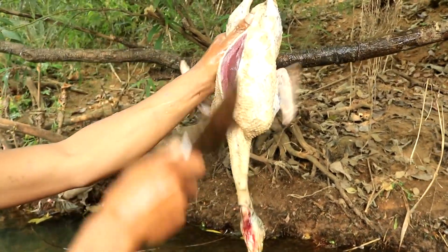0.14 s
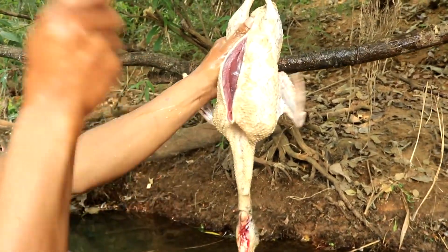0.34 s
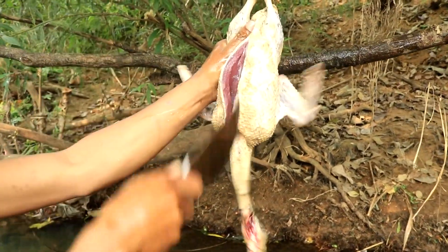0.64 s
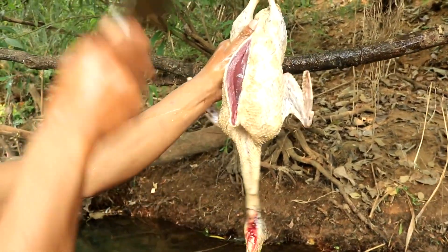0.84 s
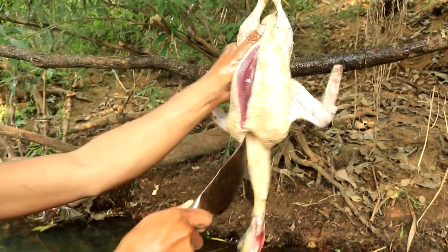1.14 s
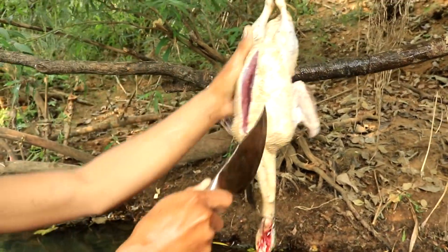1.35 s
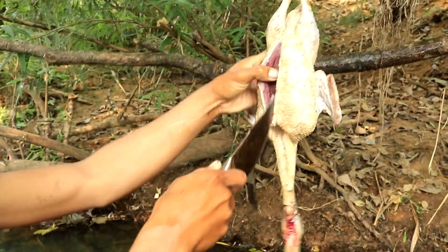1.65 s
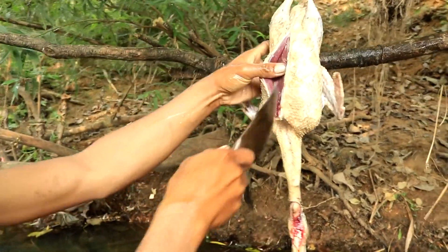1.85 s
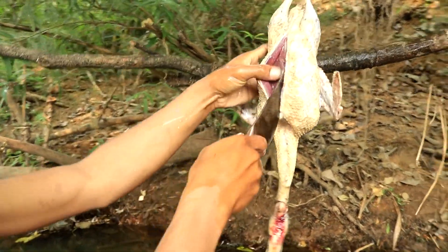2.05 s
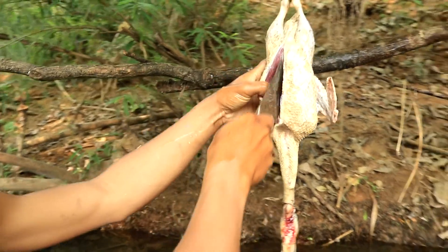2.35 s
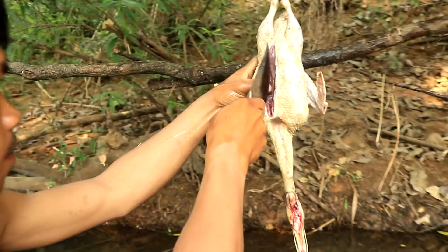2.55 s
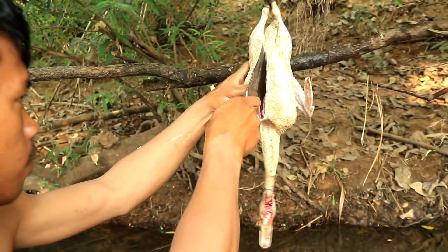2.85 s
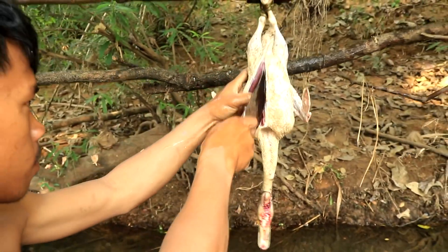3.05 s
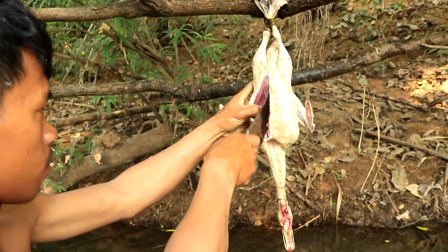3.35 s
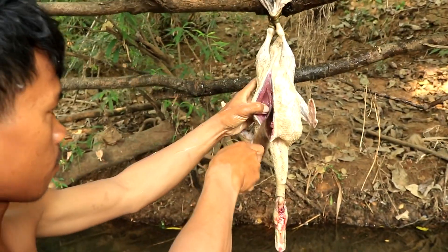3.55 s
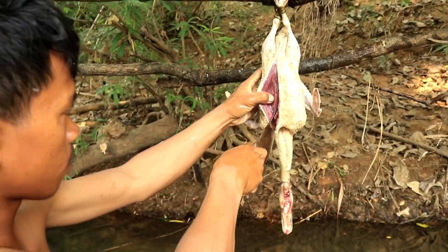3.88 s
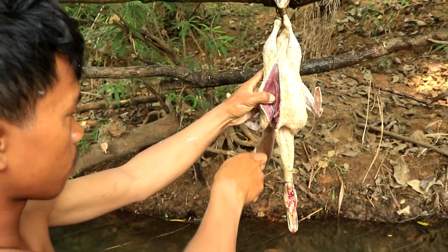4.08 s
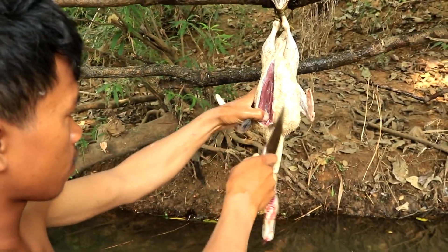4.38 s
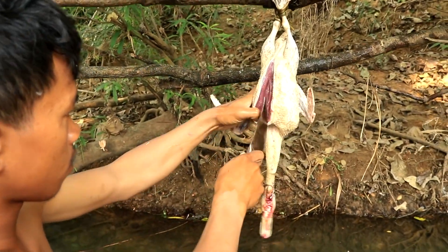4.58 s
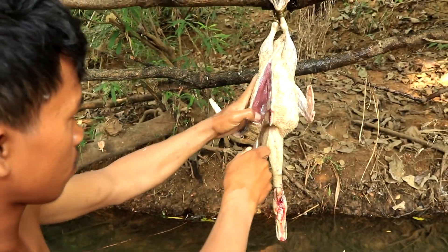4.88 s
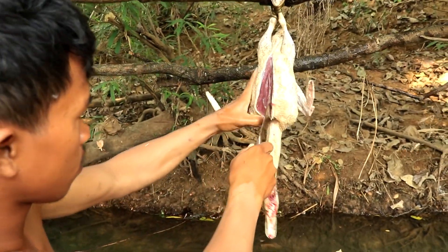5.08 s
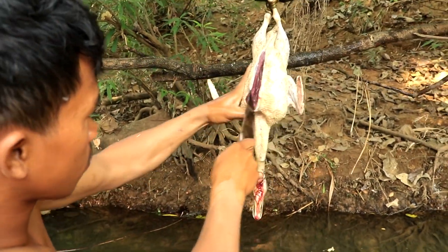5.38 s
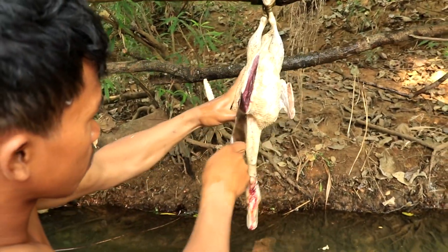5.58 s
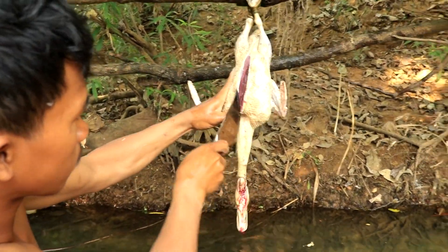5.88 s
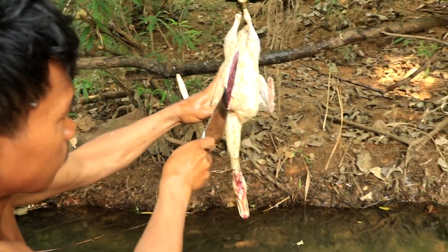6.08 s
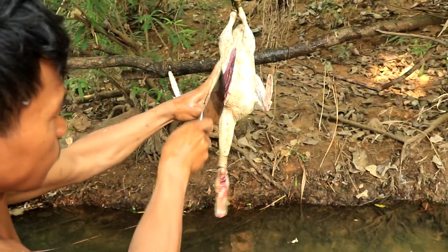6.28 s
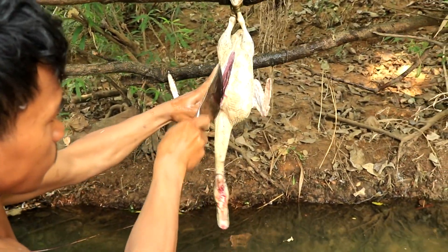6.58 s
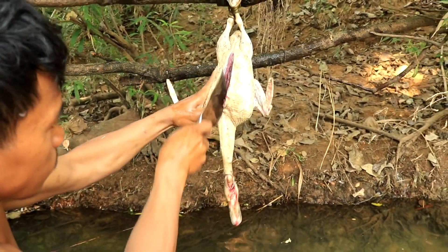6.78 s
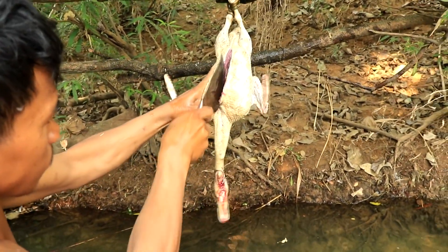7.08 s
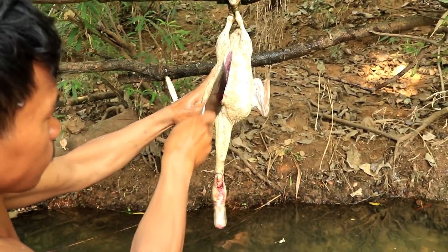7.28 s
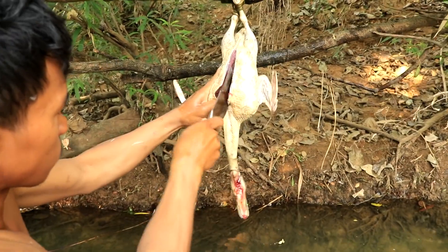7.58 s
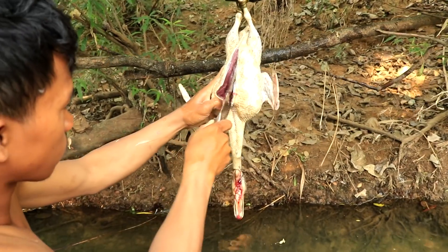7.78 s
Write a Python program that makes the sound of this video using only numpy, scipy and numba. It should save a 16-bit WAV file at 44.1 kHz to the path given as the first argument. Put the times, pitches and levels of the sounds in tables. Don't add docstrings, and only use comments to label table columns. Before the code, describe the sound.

By a murmuring jungle stream with shrill insects, a knife chops bone three times, taps lightly, and finally saws flesh in fast metallic rasps.

```python
import sys
import numpy as np
from scipy import signal
from scipy.fft import rfft, irfft
from scipy.io import wavfile
from scipy.ndimage import uniform_filter1d
from numba import njit

SR = 44100
rng = np.random.default_rng(int(sys.argv[2]) if len(sys.argv) > 2 else 0)


def magnitude_from_level(level_db):
    exponent = np.asarray(level_db, float) / 20
    return 10 ** exponent


def unload_wav(signal):
    wavfile.write(
        sys.argv[1],
        SR,
        np.round(np.clip(np.atleast_2d(signal).T, -1, 1) * 32767).astype(np.int16),
    )


N = 349697
TIME = np.arange(N) / SR
HZ = np.maximum(np.arange(N // 2 + 1) * SR / N, 1)
RISE_S = .0001


def unit(x):
    return x / np.sqrt(np.mean(x ** 2))


def on_log(table):
    hz, value = np.transpose(table)
    return np.interp(np.log(HZ), np.log(hz), value)


def noise(like):
    mid, side = rfft(rng.standard_normal((2, N)))
    like = np.clip(like, 0, 1)
    return np.sqrt(1 + like) * mid + np.sqrt(1 - like) * side * np.array([[1], [-1]])


def hiss(table, like):
    return unit(irfft(noise(like) * magnitude_from_level(on_log(table)), N))


def walk(rate):
    hold = int(SR / rate)
    steps = np.repeat(rng.standard_normal(N // hold + 1), hold)
    return unit(uniform_filter1d(uniform_filter1d(steps, hold), hold)[:N])


def ring(x, hz, t60):
    pole = np.exp(2j * np.pi * hz / SR - np.log(1000) / (t60 * SR))
    return signal.lfilter([0, pole.imag], [1, -2 * pole.real, abs(pole) ** 2], x)


def body(x, modes):
    out = 0
    for k, (hz, width, db) in enumerate(modes):
        out = out + magnitude_from_level(db) * (-1) ** k * signal.lfilter(*signal.iirpeak(hz, hz / width, SR), x)
    return out


def burst(s, t60, rise):
    part = slice(max(int((s - 6 * rise) * SR), 0), int((s + 2 * t60) * SR))
    t = TIME[part] - s
    return part, np.where(t < 0, np.exp(np.minimum(t, 0) / rise), magnitude_from_level(-60 * t / t60))


def pan(db):
    return magnitude_from_level(np.array([db, -db]) / 2).reshape(2, -1)


def left_late(x, samples):
    return irfft(rfft(x) * np.exp(-2j * np.pi * HZ / SR * np.array([[samples], [0]])), N)


def stream(db, splash_db):
    # (frequency [Hz], level [dB])
    water_colour = [(13, -37), (22, -10), (54, -3), (153, -6.5), (194, -11), (312, -8), (512, -11.5),
                    (619, -14), (823, -14.5), (1490, -12.5), (3490, -18), (4310, -20), (5340, -24),
                    (6300, -24.5), (8190, -68.5), (13900, -120)]
    # (frequency [Hz], correlation [0-1])
    likeness = [(60, 0.86), (300, 0.56), (700, 0.53), (1500, 0.15), (3000, 0.23)]
    swell, gust = walk(0.83), walk(18)
    white = noise(on_log(likeness)) * magnitude_from_level(on_log(water_colour))
    out = 0
    for hz in 25 * 2 ** np.arange(0, 8.6, .5):
        share = np.clip(1 - np.abs(2 * np.log2(HZ / hz)), 0, 1)
        gust_db = np.interp(np.log(hz), np.log([50, 200]), [3.5, 0])
        splashing = np.interp(np.log(hz), np.log([1500, 3500]), [0, 1])
        tilt_db = (splash_db - splash_db.mean()) * splashing
        level_db = 0.7 * swell + walk(6) + gust_db * gust + tilt_db
        out = out + irfft(white * share, N) * magnitude_from_level(level_db)
    return left_late(unit(out) * magnitude_from_level(db + 8.5) * pan(0.096), 5.94)


def insects(db):
    # (frequency [Hz], level [dB])
    trill = [(3710, -47), (6300, -48.5), (6580, -6), (7310, 3), (7680, 2), (8000, -13.5), (8280, -4),
             (8340, -36), (8500, -29.5), (11000, -46), (18700, -120)]
    out = 0
    for hz in np.arange(6560, 8400, 150):
        share = np.exp(-((HZ - hz) / 110) ** 4) * magnitude_from_level(on_log(trill))
        rate_hz = 45 * rng.integers(1, 4) * (1 + 0.031 * walk(2))
        phase = 2 * np.pi * np.cumsum(rate_hz) / SR + 2 * np.pi * rng.random()
        throb = 1 + .5 * np.sin(phase)
        out = out + irfft(noise(0) * share, N) * throb * magnitude_from_level(1.9 * walk(5.4))
    return unit(out) * magnitude_from_level(db + 3.5)


def leaves(db):
    # (frequency [Hz], level [dB])
    leaf_colour = [(5000, -8.5), (8500, -2.5), (8620, -3), (9550, -2.5), (13100, -7.5), (15100, -7),
                   (16200, -23.5)]
    flutter_db = 1.13 * walk(300) + 0.84 * walk(25)
    return hiss([(4000, -5.5)] + leaf_colour, 0) * magnitude_from_level(db + 6.5 + flutter_db)


def chops():
    # (time [s], crack [dB], crack t60 [s], thud [dB], blade ring [dB])
    contacts = [
        (.0162, -36.5, 0.036, -46.5, -76),
        (.0173, -9.5, 0.033, -6.5, -63),
        (.5523, 4, 0.016, -38, -7.5),
        (.5542, -9, 0.01, -18.5, -31),
        (1.1175, -23, 0.012, -50, -49),
        (1.1187, -10, 0.041, -11.5, -23.5),
    ]
    # (frequency [Hz], level [dB])
    crack_colours = [
        [(240, -41.5), (400, 2.5), (730, -6.5), (3210, -1.5), (3690, -9.5), (9180, -8.5), (10100, -3.5),
         (14600, -18), (16000, -32)],
        [(240, -21), (400, -32), (1650, -8), (3120, -5.5), (7870, -6.5), (9760, -8), (10500, -5), (13300, -6),
         (16000, -42)],
        [(240, -21), (400, 0), (1580, -11.5), (2550, -7), (5960, -1), (10500, -1), (12700, 1.5), (15300, -8),
         (16000, -33)],
    ]
    # (time [s], frequency [Hz], level [dB], t60 [s])
    snaps = [
        (.0177, 1250, 1.5, .004),
        (1.1184, 6000, 3.5, .004),
    ]
    # (frequency [Hz], level [dB], t60 [s])
    blade_modes = [(2690, -19, 0.095), (3120, -2.5, 0.0395), (3230, -36, 0.38), (5730, -3, 0.0182),
                   (9050, -29, .04), (9700, 3, 0.027), (11460, -4, 0.025)]
    contact_pan_db = (0, -5)
    out, kick, push = np.zeros((3, 2, N))
    cracks = [hiss(colour, 0.88) for colour in crack_colours]
    scatter = hiss([(1000, -22), (4000, -13), (9500, -10), (16000, -21)], .4)
    for k, (s, crack_db, t60, thud_db, ring_db) in enumerate(contacts):
        side = pan(contact_pan_db[k % 2])
        part, env = burst(s, t60, RISE_S)
        out[:, part] += magnitude_from_level(crack_db) * env * cracks[k // 2][:, part] * side
        part, env = burst(s, .12, RISE_S)
        out[:, part] += magnitude_from_level(crack_db - 27) * env * scatter[:, part]
        kick[:, int(s * SR)] = magnitude_from_level(ring_db) * side[:, 0]
        part, env = burst(s + 0.00034, 0.0007, 0.0001)
        push[:, part] -= magnitude_from_level(thud_db) * env / env.sum()
    for s, hz, db, t60 in snaps:
        hit = np.arange(N) == int(s * SR)
        out += ring(-magnitude_from_level(db) * hit, hz, t60) * pan(-2.6)
    thud = ring(push, 284, 0.032) + magnitude_from_level(-14.5) * ring(push, 454.4, 0.057)
    blade = sum(magnitude_from_level(db) * ring(kick, hz, t60) for hz, db, t60 in blade_modes)
    return out + thud + blade


def drips():
    # (time [s], level [dB], pitch [Hz], t60 [s], rise of pitch [1/s])
    bubbles = [(0.277, -40.5, 2900, 0.0174, 2), (.695, -37.5, 1500, 0.0073, 1),
               (1.579, -32.5, 653, 0.03, 2.2), (1.71, -42, 1770, 0.0475, 3), (2.789, -41, 2550, 0.022, 2),
               (3.075, -39.5, 2220, 0.021, 2), (3.125, -33.5, 870, 0.11, 1.4), (3.16, -49, 1010, 0.55, 8),
               (3.255, -40, 2070, .02, 3), (3.355, -41, 2660, 0.023, 2), (7.71, -48, 1240, 0.045, 1.6)]
    out = np.zeros(N)
    for s, db, hz, t60, glide in bubbles:
        part, env = burst(s, t60, 0.000122)
        t = TIME[part] - s
        tone = np.sin(2 * np.pi * hz * (t + glide * t * t / 2))
        out[part] += magnitude_from_level(db + 1.7 * walk(60)[part]) * env * tone
    return out * pan(-1.8)


def ticks():
    # (time [s], treble [dB], knock [dB], knock pitch [Hz], bass [dB])
    taps = [
        (1.3662, -32, -40, 2400, -63),
        (1.6328, -36, -39, 3640, -57),
        (2.3138, -41, -36, 2930, -64),
        (3.125, -44, -31, 3970, -47),
        (5.744, -31, -36.5, 5690, -58),
        (5.9478, -26, -27.5, 3200, -36.5),
        (6.1968, -29, -27, 3860, -58),
    ]
    # (time [s], treble [dB], knock [dB], bass [dB])
    catches = [(5.9713, -39, -41, -60), (6.2397, -39, -41, -45), (6.4481, -26, -23, -37.5),
               (6.419, -49, -34.5, -55), (6.5573, -33, -25, -45), (6.596, -36, -33, -40),
               (6.681, -21.5, -24, -45), (6.7119, -27, -24, -34.5), (6.946, -30, -29.5, -35.5),
               (7.0409, -35, -28.5, -43), (7.1632, -26.5, -36, -53), (7.18, -32, -32, -52),
               (7.189, -36, -26, -50), (7.213, -23.5, -47.5, -34.5), (7.447, -31, -28, -46),
               (7.4547, -30, -36.5, -37), (7.479, -27, -28, -43)]
    # (time [s], level [dB], knock pitch [Hz], left minus right [dB])
    crackles = [(0.395, -34.5, 5620, 4), (0.4612, -37.5, 4710, 8), (1.504, -39, 2690, 11.5),
                (3.6, -39.5, 2690, -11), (4.6444, -38, 2190, -8.5), (4.8313, -40, 2450, 1.5),
                (4.8383, -37.5, 4240, 1.5), (4.9656, -45, 4640, -4), (6.125, -41, 2200, -6.5),
                (7.4024, -40, 2420, 0), (7.424, -35, 2760, 7), (7.522, -38, 2140, 0),
                (7.642, -39, 2040, 9.5), (7.7641, -36.5, 3470, 15), (7.884, -33.5, 2000, 10)]
    knife_pan_db, catch_hz = -4, 2700
    spit = hiss([(3000, -40), (6000, 0.5), (10000, 5.5), (16000, -6.5)], 0.56)
    knock = hiss([(700, -7.5), (2500, -1.5), (4500, -3), (8000, -28)], 0.69)
    rows = [(*tap, knife_pan_db) for tap in taps]
    rows += [(s, treble, mid, catch_hz, bass, knife_pan_db) for s, treble, mid, bass in catches]
    rows += [(s, db, db - 10, hz, db - 21, side_db) for s, db, hz, side_db in crackles]
    out, push = np.zeros((2, 2, N))
    for s, treble_db, knock_db, hz, bass_db, pan_db in rows:
        part, env = burst(s, 0.019, RISE_S)
        pitched = unit(knock[:, part] + 1.8 * body(knock[:, part], [(hz, 600, 0)]))
        snap = magnitude_from_level(treble_db - 3) * spit[:, part] + magnitude_from_level(knock_db - 4) * pitched
        out[:, part] += env * pan(pan_db) * snap
        push[:, int(s * SR)] = magnitude_from_level(bass_db + 4)
    return out + ring(push, 325, 0.026)


def singing():
    # (time [s], level [dB], t60 [s], stilled by the grip at [s], muffled at first [0-1])
    long_notes = [
        (.5525, -37, 1.207, 1.024, .8),
        (1.119, -32.5, 0.55, 1.23, .05),
    ]
    # (time [s], level [dB], length [s], frequency [Hz], width [Hz])
    touches = [
        (.588, -32, 0.051, 9000, 200),
        (2.326, -58.5, 0.69, 4290, 150),
        (3.055, -45.5, 0.037, 5800, 1000),
        (7.52, -56, .9, 140, 60),
        (3.4, -57.5, 0.41, 11000, 900),
        (3.783, -53, 0.366, 11070, 900),
        (4.788, -57, 0.76, 4290, 200),
    ]
    note_hz, sag_hz, settle_s = 4290, 90, .022
    beat_hz, beat_depth = 6.1, 0.33
    out = np.zeros(N)
    for s, db, t60, stilled, muffled in long_notes:
        part, env = burst(s, t60, RISE_S)
        t = np.maximum(TIME[part] - s, 0)
        loaded = np.exp(-t / settle_s)
        grip = (1 - muffled * loaded) / (1 + np.exp((TIME[part] - stilled) / 0.038))
        hz = note_hz - sag_hz * loaded + 4 * walk(12)[part]
        swing = 1 - beat_depth * np.cos(2 * np.pi * beat_hz * (t - .03))
        tone = np.sin(2 * np.pi * np.cumsum(hz) / SR)
        out[part] += magnitude_from_level(db + 0.52 * walk(27.4)[part]) * env * grip * swing * tone
    for s, db, length, hz, width in touches:
        part, env = burst(s, 2 * length, 0.0063)
        rub = rng.standard_normal(len(env))
        out[part] += magnitude_from_level(db) * env * unit(body(rub, [(hz, width, 0)]))
    return out * pan(-2.17)


def fly():
    # (time [s], wing beat [Hz], level [dB])
    flight = [
        (3.85, 329.4, -65),
        (3.95, 339.5, -49),
        (4.01, 387, -52),
        (4.1, 338, -53),
        (4.16, 320, -59),
        (4.27, 373, -60),
        (4.4, 400, -57.5),
        (4.5, 400, -73),
    ]
    s, hz, db = np.transpose(flight)
    wing_hz = np.interp(TIME, s, hz) * (1 + .06 * walk(50))
    phase = 2 * np.pi * np.cumsum(wing_hz) / SR
    level_db = np.interp(TIME, s, db, -150, -150) + 3.3 * walk(21.97)
    return magnitude_from_level(level_db) * (np.sin(phase) + 0.19 * np.sin(2 * phase))


def pressure():
    # (time of greatest pressure [s], blade level there [dB], build-up [s], let-off [s],
    # rasp [dB]: skin scrapes more than it rings)
    strokes = [(6.342, -45, 0.079, 0.021, 4.5), (6.452, -45.5, 0.041, 0.039, -1.5),
               (6.572, -35.5, 0.034, .03, -2.5), (6.606, -36, 0.022, 0.023, -2),
               (6.683, -37, 0.0289, 0.04, -1.5), (6.714, -42, .015, 0.04, 2), (6.83, -39, 0.0466, 0.043, 0),
               (6.95, -39.5, 0.0081, 0.036, 1.5), (7.058, -36.5, .028, .02, -2),
               (7.088, -32, .05, 0.048, 0.5), (7.195, -31, 0.023, 0.05, -1),
               (7.33, -34.5, 0.0368, 0.062, -1), (7.451, -42, .01, 0.0313, 2.5),
               (7.481, -45, 0.0147, 0.018, 3.5)]
    edge_db, curve = 24.5, 1.68
    out, rasp = np.full(N, -200.), np.zeros(N)
    for s, db, build, release, rasp_db in strokes:
        t = TIME - s
        stroke = db - edge_db * np.abs(t / np.where(t < 0, build, release)) ** curve
        rasp[stroke > out] = rasp_db
        out = np.maximum(out, stroke)
    return out, uniform_filter1d(rasp, size=300)


def sawing():
    # (frequency [Hz], width [Hz], level [dB])
    held_blade = [(1190, 480, -15), (2000, 860, -15.5), (2712, 195, 7), (3285, 770, -6)]
    # (frequency [Hz], width [Hz], level [dB])
    high_notes = [(6080, 910, -8.5), (8880, 220, -2), (9695, 140, 1.5), (11300, 220, -7), (12250, 320, -8)]
    # (frequency [Hz], width [Hz], level [dB])
    carcass_modes = [(212, 77, -3), (303, 54, 0.5), (484, 155, -8.5)]
    blade_db, rasp_db = pressure()
    touching = np.clip((blade_db + 77) / 15, 0, 1)
    firm_db = -40

    def saturating(db, share):
        return touching * magnitude_from_level(firm_db + rasp_db + db + share * (blade_db - firm_db))

    carcass = saturating(-5.5, 0.6)
    bright = saturating(-3.5, 0.66)
    upper = saturating(-12.5, 0.62) * magnitude_from_level(-18 * (TIME - 6.98))

    grit = hiss([(100, 0), (16000, 0)], 0.91) * magnitude_from_level(1.86 * walk(250) + 1.14 * walk(90))
    slips = rng.random(N) < 350 / SR
    grit = grit + slips * rng.standard_normal(N) * magnitude_from_level(15)

    shake = 0
    for hz, width, db in held_blade:
        mode = body(body(grit, [(hz, width, 0)]), [(hz, 2 * width, 0)])
        shake = shake + magnitude_from_level(db + 2 * walk(40)) * mode
    notes = sum(body(grit, [mode]) * magnitude_from_level(4.9 * walk(25)) for mode in high_notes)
    air_colour = [(1000, -8.5), (2500, 2.5), (7000, -8.5), (10000, -0.5), (13000, -11), (16000, -20)]
    air = irfft(rfft(grit) * magnitude_from_level(on_log(air_colour)), N)
    upper_note = unit(body(grit, [(4290, 65, 0)]))

    steel = magnitude_from_level(blade_db) * unit(shake)
    steel = steel + upper * magnitude_from_level(-4 + 3.5 * walk(30)) * upper_note
    steel = steel + bright * (unit(air) + magnitude_from_level(-2.5) * unit(notes))
    flesh = carcass * magnitude_from_level(0.3) * unit(body(grit, carcass_modes))
    return steel * pan(-3.1) + flesh * pan(0.6)


def scene():
    # (time [s], level [dB])
    stirring = [(0, 9), (.37, 1.5), (.6, 6), (1.5, 3), (1.9, -0.5), (2.45, -1), (2.78, -2.5), (3.05, -0.5),
                (3.42, 4), (3.6, -0.5), (4.04, -1.5), (4.45, -3.5), (4.68, -2), (5.37, -3), (5.72, -0.5),
                (6.14, -1.5), (7.3, 2), (7.93, 3)]
    stir = np.interp(TIME, *np.transpose(stirring))
    near = chops() + singing() + sawing() + ticks() + drips() + fly()
    low_cut = signal.butter(2, 110, "high", fs=SR, output="sos")
    near = signal.sosfilt(low_cut, left_late(near, 0.66))
    return near + insects(-50.5 + 0.13 * stir) + stream(-57.5, 0.59 * stir) + leaves(-60 + stir)


@njit
def follow(x, attack, release):
    e, out = 0., np.empty(len(x))
    for i in range(len(x)):
        e += (x[i] - e) * (attack if x[i] > e else release)
        out[i] = e
    return out


def low_pass(x):
    return signal.sosfilt(signal.butter(12, 16460, fs=SR, output="sos"), x)


def record(dry):
    dry = signal.sosfilt(signal.ellip(10, .2, 50, 15950, fs=SR, output="sos"), dry)
    env = follow(np.abs(dry).max(axis=0), 1 / (.006 * SR), 1 / (.045 * SR))
    gain = (1 + (env / magnitude_from_level(-27)) ** 4) ** -.2
    gain = np.maximum(gain, magnitude_from_level(-6.5))
    mix = np.clip(dry * uniform_filter1d(gain, 90), -1, 1)
    return low_pass(mix)


dry = scene()
out = record(dry)
unload_wav(out)
```